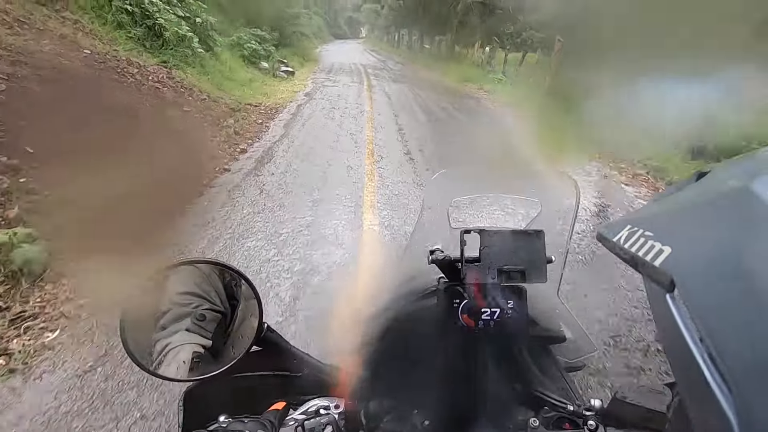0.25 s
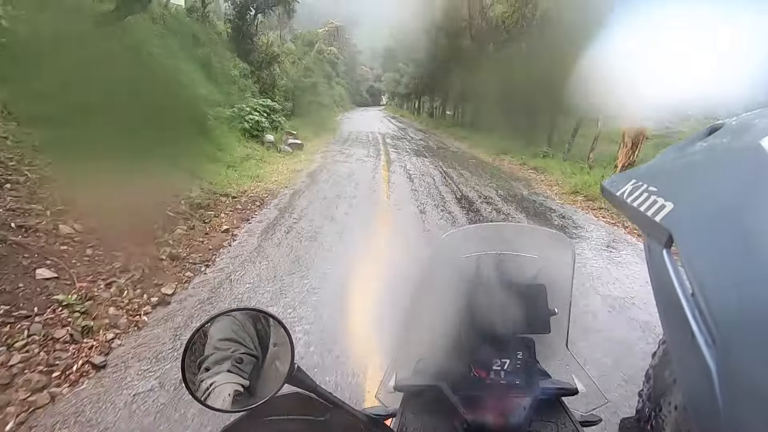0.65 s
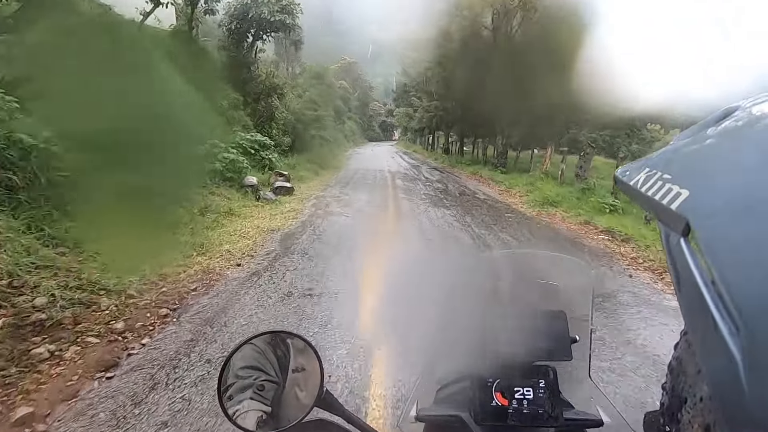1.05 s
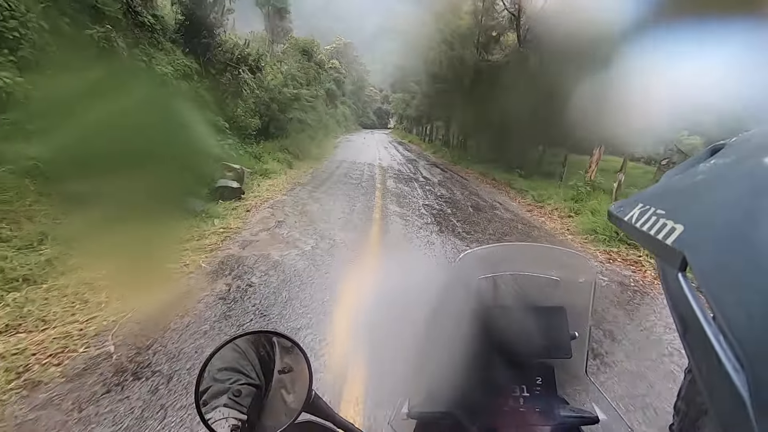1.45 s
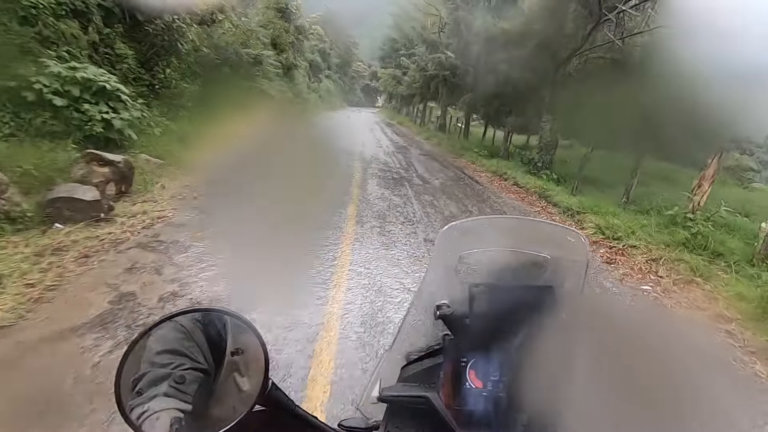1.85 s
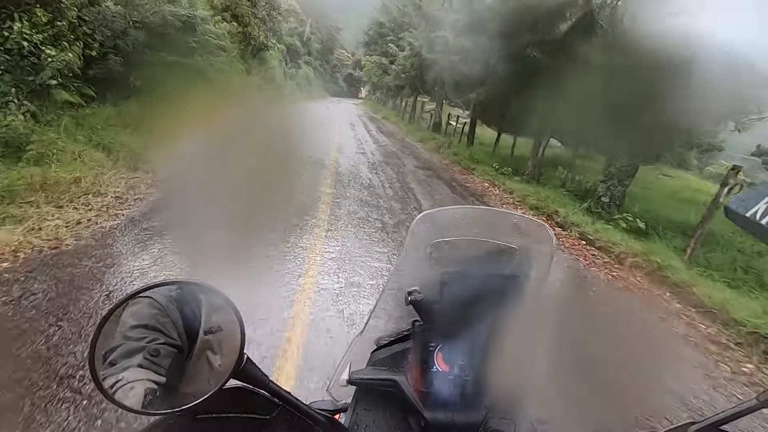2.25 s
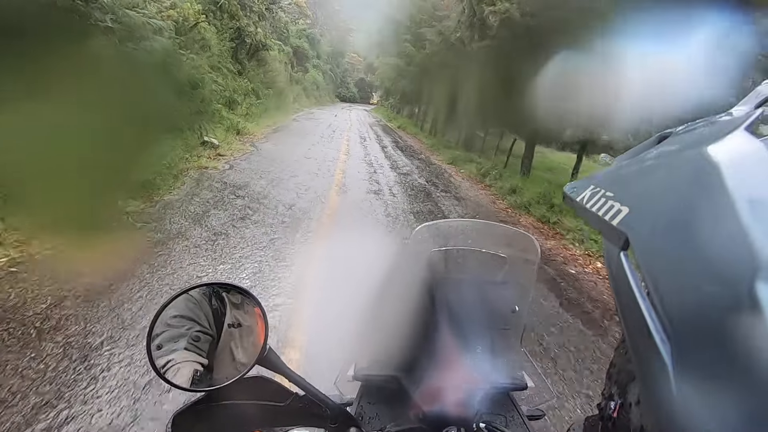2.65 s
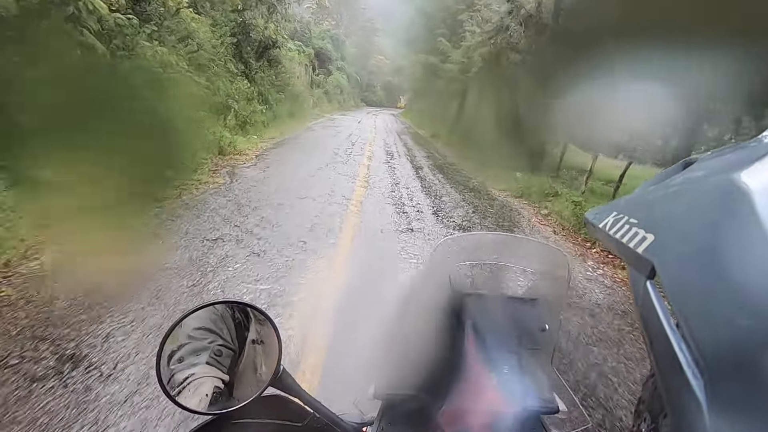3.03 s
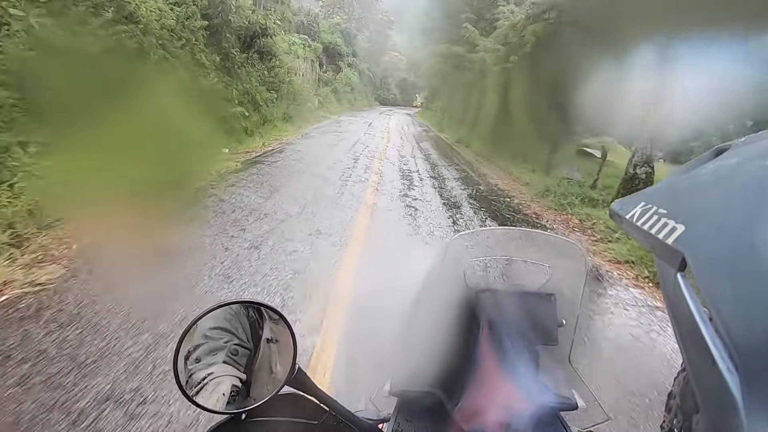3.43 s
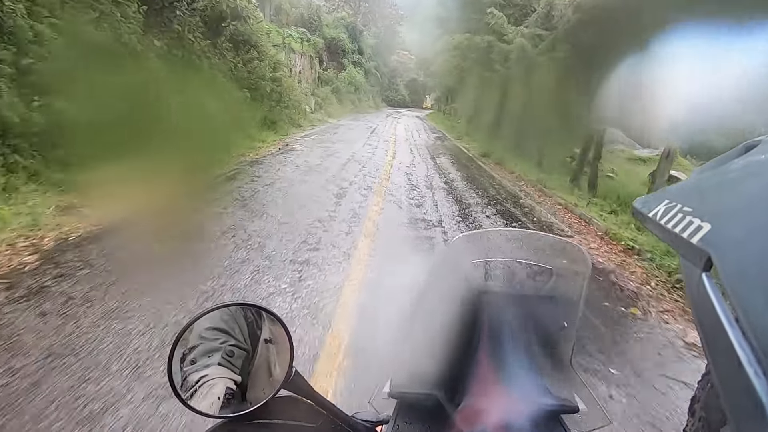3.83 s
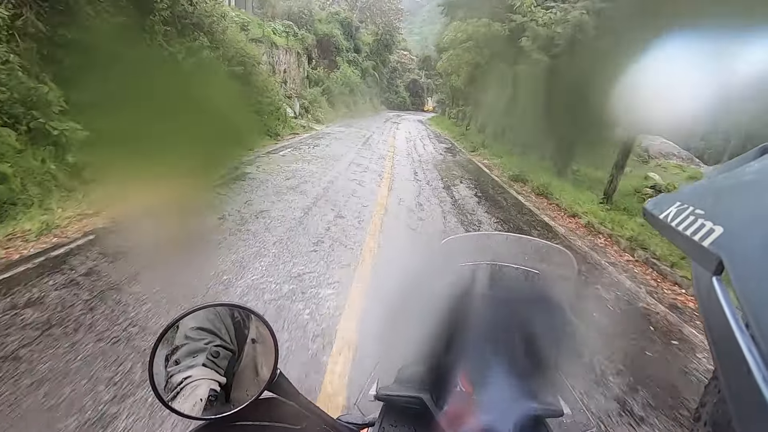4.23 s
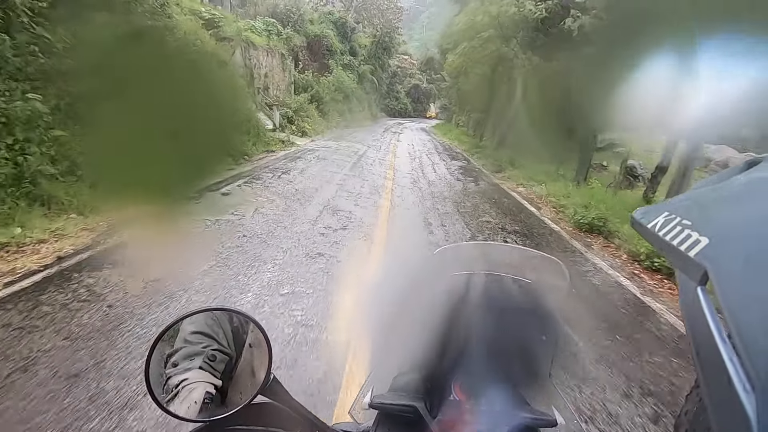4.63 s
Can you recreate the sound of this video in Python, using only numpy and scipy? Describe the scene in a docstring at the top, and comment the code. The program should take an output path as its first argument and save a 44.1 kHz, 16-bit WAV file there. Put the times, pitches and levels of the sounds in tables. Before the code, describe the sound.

Wind rumbles and tears at a rider's helmet over a low motorcycle drone, with hissing wet tyres and ticking raindrops.

```python
"""A motorcycle engine pulls, shifts up and drones on along a wet road in rain, heard at the rider's helmet.
The engine is a stack of harmonics of its firing rate, with whining gears and a ringing casing.
Wind is filtered noise: a steady rumble, flickering eddies and single slaps that merge into a tearing
roar in the gusts. Tyres hiss as grainy noise, a puddle splashes brighter, and raindrops tick as tiny
splashes with a short ring. At set moments the midrange of the wind and tyres turns hollow."""
import sys
import numpy as np
from scipy import signal
from scipy.fft import rfft, irfft
from scipy.io import wavfile
from scipy.ndimage import uniform_filter1d, minimum_filter1d

SR = 44100
rng = np.random.default_rng(int(sys.argv[2]) if len(sys.argv) > 2 else 0)


def bounce(signal):
    """Save signal as a 16-bit WAV file at the path given by the first command-line argument."""
    frames = np.transpose(np.atleast_2d(signal))
    limited = np.clip(frames, -1, 1)
    pcm = np.round(limited * 32767).astype(np.int16)
    wavfile.write(sys.argv[1], SR, pcm)


N = 215384
TIME = np.arange(N) / SR

# Levels in the tables are relative: the functions add their own trims and flutter.
# engine speed and loudness: t/s, average firing rate f/Hz, level/dB
ENGINE = [(0, 99.5, -16), (.2, 93.3, -21), (.45, 97.8, -21.5), (.75, 98.04, -18.5), (1.05, 103.6, -20),
          (1.25, 108.5, -29.5), (1.48, 114.7, -14.5), (1.62, 120.7, -30), (1.9, 125.2, -21.5),
          (2.55, 143.9, -20.5), (2.75, 121, -34), (3.0, 94.56, -30.5), (3.15, 90.2, -24), (3.35, 85, -26),
          (3.55, 85.13, -21.5), (3.85, 80.4, -22), (4.03, 81.35, -20.5), (4.25, 81.3, -20),
          (4.5, 79.5, -31), (4.72, 79, -23), (4.88, 77.5, -32)]
# exhaust note: multiple of the firing rate, level/dB
EXHAUST_ORDERS = [(.5, -12.5), (1, 2.5), (1.5, -12.5), (2, -16.5), (3, -20.5), (4, -27.5), (5, -28.5),
                  (6, -28.5)]
# resonances of the engine casing: f/Hz, width/Hz, level under load/dB
CASING = [(1610, 310, -48), (2100, 200, -51.5), (2914, 110, -58), (3820, 72, -62), (4550, 150, -64)]
# wake of the helmet: t/s, level/dB
RUMBLE = [(0, -18), (.8, -17.5), (1.4, -15.5), (2.1, -21.5), (2.92, -14.5), (3.12, -23), (3.4, -15.5),
          (4.0, -18), (4.27, -15.5), (4.5, -16.5), (4.88, -16.5)]
# airflow at the microphone: t/s, strength/dB, fine eddies relative to coarse ones/dB
GUST = [(0, -28, -6), (.07, -40, -6), (.44, -40, -1), (.52, -31, -7.5), (.64, -40, -0.5), (.96, -37.5, -7),
        (1.02, -28, -4.5), (1.18, -26.5, -7), (1.45, -33, -3.5), (1.8, -25.5, -5.5), (1.96, -27, 0.5),
        (2.01, -23, 1), (2.45, -23, 0.5), (2.61, -19.5, -4), (2.68, -24, -6), (2.89, -20.5, -5.5),
        (3.11, -30.5, -1.5), (3.32, -31.5, 0), (3.41, -28.5, -4.5), (3.66, -32.5, -2.5), (3.75, -24.5, -8),
        (3.86, -25.5, -2), (3.97, -28.5, -4.5), (4.05, -32, -2.5), (4.13, -29, -7), (4.26, -22, -5.5),
        (4.42, -31, -3.5), (4.66, -37, 2), (4.77, -29.5, -4.5), (4.88, -29.5, -3)]
# largest eddies: t/s, length/s, low push/dB, midrange flap/dB, tearing rasp/dB
SLAPS = [(0.029, 0.0059, -26.5, -36.0, -41.0), (0.092, 0.012, -31, -34.5, -47),
         (0.174, 0.0092, -19, -34, -43.0), (0.23, 0.013, -24, -31.5, -43.0),
         (0.289, 0.009, -24, -26.5, -37), (0.305, 0.01, -27, -37, -44), (0.376, 0.0096, -16, -30, -39),
         (0.404, 0.0087, -29.5, -33, -40), (0.48, 0.014, -22.5, -30.5, -40),
         (0.517, 0.0072, -23, -38.0, -41), (0.615, 0.021, -26.5, -33.5, -41), (0.87, 0.018, -25, -29, -36),
         (0.926, 0.0062, -26, -34, -45), (0.986, 0.013, -32.5, -27.5, -43),
         (1.015, 0.014, -28, -35.0, -38.5), (1.122, 0.0097, -25.5, -37, -41),
         (1.144, 0.022, -25, -33, -37.5), (1.203, 0.015, -27, -31, -35), (1.238, 0.0065, -18, -30.0, -44),
         (1.325, 0.0086, -19.5, -38, -34.5), (1.358, 0.017, -27, -32.5, -36),
         (1.411, 0.0083, -21, -43, -44.0), (1.435, 0.016, -36, -33, -39), (1.48, 0.016, -24, -33.0, -42.5),
         (1.578, 0.0079, -38.5, -28, -38), (1.613, 0.011, -25.5, -40, -43),
         (1.646, 0.0085, -37.5, -28.5, -36), (1.672, 0.023, -20.5, -27, -32),
         (1.779, 0.015, -16.5, -33, -31), (1.859, 0.016, -25.0, -28, -37), (1.887, 0.017, -26, -28, -30.5),
         (1.986, 0.011, -24, -19.5, -22.5), (2.06, 0.018, -29.0, -29, -25.5), (2.146, 0.01, -23, -22, -36),
         (2.241, 0.015, -30, -26, -27), (2.498, 0.019, -20, -23, -31), (2.528, 0.0086, -25, -23, -31),
         (2.632, 0.012, -22, -25.5, -25), (2.676, 0.0076, -19, -18.5, -27.5),
         (2.707, 0.008, -32.5, -18, -28), (2.733, 0.016, -23, -24, -30.5), (2.786, 0.013, -14.5, -27, -41),
         (2.868, 0.016, -18.5, -26, -37), (2.902, 0.014, -22, -26.5, -28.5),
         (2.924, 0.008, -18.0, -24, -29), (3.001, 0.017, -21.5, -23.5, -30.5),
         (3.065, 0.018, -26, -28, -29), (3.167, 0.029, -27.0, -33, -34.0),
         (3.244, 0.0098, -25, -34.0, -45.5), (3.272, 0.0077, -28, -28.5, -49),
         (3.342, 0.012, -30, -45.0, -46.0), (3.403, 0.0097, -19, -22.5, -33.5),
         (3.434, 0.018, -24.5, -33.5, -42.0), (3.506, 0.016, -23, -29.5, -34.5),
         (3.557, 0.023, -28, -30, -43), (3.689, 0.013, -26, -33.0, -43), (3.744, 0.005, -31, -22, -39),
         (3.777, 0.0085, -28, -28, -41), (3.804, 0.013, -19, -29, -36), (3.838, 0.012, -17, -30.5, -29),
         (3.89, 0.0088, -24.0, -27, -26), (3.959, 0.0095, -36.5, -25.5, -34),
         (3.993, 0.0068, -18, -29, -35), (4.101, 0.012, -17.5, -27.5, -39.0),
         (4.133, 0.013, -29, -29, -28.5), (4.147, 0.0073, -25, -19.5, -28),
         (4.196, 0.024, -18.5, -22, -31.5), (4.25, 0.0065, -21.5, -20.5, -39),
         (4.289, 0.011, -23, -26, -24), (4.322, 0.0059, -27, -19.5, -36), (4.353, 0.019, -26, -30.5, -34),
         (4.449, 0.024, -25.5, -36, -41), (4.515, 0.012, -26.0, -30.5, -45), (4.55, 0.0083, -35, -37, -37),
         (4.601, 0.021, -26.5, -31.5, -41), (4.681, 0.016, -28, -29.5, -34),
         (4.71, 0.0056, -33, -29, -46.5), (4.761, 0.016, -25.5, -27, -33.0), (4.807, 0.01, -19, -19.5, -30),
         (4.845, 0.0094, -20, -29, -37)]
# moments when the midrange is thinned: start t/s, end t/s, lower edge f/Hz, upper edge f/Hz
HOLLOWS = [(3.137, 3.148, 201, 800), (3.219, 3.385, 435, 1140), (3.458, 3.677, 372, 680),
           (4, 4.114, 188, 1018), (4.39, 4.697, 250, 710)]
# spray from the tyres: t/s, level/dB
SPRAY = [(0, -45.5), (.54, -49), (.66, -46), (1.42, -45), (1.85, -40.5), (2.35, -38.5), (2.72, -45.5),
         (2.95, -42), (3.17, -48), (3.4, -42), (3.62, -42), (3.82, -41.5), (4.0, -40), (4.09, -45),
         (4.17, -39.5), (4.36, -40), (4.49, -45), (4.62, -43.5), (4.88, -41.5)]
# large raindrops on the housing: t/s, splash peak level/dB, ring f/Hz, ring peak level/dB
DROPS = [(.133, -51, 3090, -50), (.3805, -50, 3030, -50), (.4474, -49, 3780, -48), (.5636, -51, 3600, -48),
         (.8096, -49, 3050, -48), (.8589, -50, 3010, -48), (1.376, -48, 3200, -34), (1.436, -49, 3050, -46),
         (1.6536, -50, 3450, -44), (1.711, -39, 3660, -23), (1.859, -34, 7457, -44),
         (1.927, -44, 3013, -45), (2.37, -47, 3990, -48), (2.68, -48, 3400, -42), (2.797, -48, 3190, -42),
         (2.836, -50, 3500, -46), (2.877, -50, 3300, -46), (2.97, -50, 3200, -46), (3.01, -50, 3400, -46),
         (3.112, -49, 5400, -44), (3.397, -38, 8270, -52), (3.512, -48, 8300, -49), (3.522, -49, 7200, -49),
         (4.0385, -46, 2200, -22), (4.048, -38.5, 7330, -47), (4.5526, -44, 3806, -40),
         (4.6558, -42.5, 3000, -36)]

# spectrum of the helmet's wake: f/Hz, level/dB
RUMBLE_COLOUR = [(40, -21), (70, -3), (100, 0), (135, -2), (170, -8.5), (230, -12), (320, -29),
                 (500, -55.5), (1000, -80)]
# spectrum of the deep buffeting: f/Hz, level/dB
DEEP_COLOUR = [(12, -1), (25, 2.5), (38, 1), (54, 10), (68, 1.5), (100, -28), (250, -80)]
# spectrum of the coarse eddies: f/Hz, level/dB
COARSE_COLOUR = [(60, -16), (140, 2.5), (250, 8), (380, 2.5), (550, 1), (800, -13), (1200, -25.5),
                 (2000, -28), (4000, -77)]
# spectrum of the fine eddies: f/Hz, level/dB
FINE_COLOUR = [(300, -25.5), (700, 7), (1100, 4.5), (1900, -1), (2600, -10), (3700, -20), (4500, -24),
               (5600, -48.5), (9000, -73), (13000, -85)]
# spectrum of a slap's blunt push: f/Hz, level/dB
PUSH_COLOUR = [(70, -30), (150, -4), (230, 0), (340, -1), (450, -13), (800, -42), (3000, -110)]
# spectrum of a slap's midrange flap: f/Hz, level/dB
BODY_COLOUR = [(280, -30), (460, -4), (560, 0), (840, -1), (1050, -14), (2000, -48), (5000, -110)]
# spectrum of a slap's tearing rasp: f/Hz, level/dB
RASP_COLOUR = [(550, -30), (950, 0), (1400, -1), (2000, -4), (2700, -14), (4200, -26), (5600, -52),
               (12000, -95)]
# spectrum of the tyre spray: f/Hz, level/dB
SPRAY_COLOUR = [(150, -24), (400, 18.5), (700, 4.5), (980, 1), (1350, -19), (2100, 0), (3000, -4),
                (3700, -8), (4400, -12.5), (5500, -24), (7500, -29.5), (9000, -40.5), (11000, -64),
                (14000, -81)]
# spectrum of the puddle's spray: f/Hz, level/dB
PUDDLE_COLOUR = [(700, -37.5), (2000, -3.5), (2800, -3), (4200, -14.0), (5500, -32.0), (9000, -48.0),
                 (13000, -78)]

# the gears unload as the rider shifts, and stay quieter: from (s), to (s), by (dB)
SHIFT_START_S, SHIFT_END_S, UNLOADED_DB = 2.3, 3.1, -12
# deep buffeting: level in the usual airflow (dB), growth (dB per dB), the usual airflow (dB)
DEEP_DB, DEEP_PER_GUST, USUAL_GUST_DB = -21.5, 0.24, -30
# a slap: time constant of its rise (s), place of the core (share of its length)
SLAP_ATTACK_S, CORE_PLACE = 0.002, 0.455
# how far the midrange drops in a hollow moment
HOLLOW_DB = 15.5
# the puddle: loudest moment (s), level there (dB), swell and fade (dB per s)
PUDDLE_S, PUDDLE_DB, PUDDLE_RISE_DB_PER_S, PUDDLE_FALL_DB_PER_S = 1.945, -32.5, 100, 150
# small raindrops: faintest splash and spread (dB), ring over splash (dB), range of the ring (Hz)
DRIZZLE_DB, DRIZZLE_SPREAD_DB, DRIZZLE_RING_DB, DRIZZLE_HZ = -62, 9, 1, (2500, 4500)
# cut-off of the final low-pass, which leaves the treble dull
EDGE_HZ = 11800


def gain_of(db):
    """Turns decibels into an amplitude factor."""
    return 10 ** (np.asarray(db) / 20)


def evened(x):
    """Scales a sound to an rms (average strength) of one."""
    return x / np.sqrt(np.mean(x ** 2) + 1e-20)


def steadied(x, size, amount=0.61):
    """Evens out part of the slow swell of a noise; size is the averaging span in samples."""
    power = uniform_filter1d(x ** 2, size=size) + 1e-6
    return evened(x / power ** (amount / 2))


def follow(rows):
    """Draws straight lines between table rows: each column at every sample."""
    s, *columns = np.transpose(rows)
    return [np.interp(TIME, s, column) for column in columns]


def coloured(x, points):
    """Filters a sound by a spectrum table, then scales it to an rms of one."""
    hz, db = np.transpose(points)
    bins_hz = np.fft.rfftfreq(N, 1 / SR)
    shape_db = np.interp(np.log(bins_hz + 1), np.log(hz), db)
    return evened(irfft(rfft(x) * gain_of(shape_db), N))


def noise(points):
    """Makes noise with the given spectrum."""
    return coloured(rng.standard_normal(N), points)


def wander(rate_hz):
    """Makes a smooth random curve of rms one that moves up to about the given rate."""
    hz = np.fft.rfftfreq(N, 1 / SR)
    # the first factor weakens drift slower than about 6 Hz
    shape = hz / (hz + 6) / (1 + (hz / rate_hz) ** 4)
    return evened(irfft(rfft(rng.standard_normal(N)) * shape, N))


def band(x, low_hz, high_hz):
    """Keeps one band of frequencies, with steep edges and no delay."""
    sos = signal.butter(4, [low_hz, high_hz], "band", fs=SR, output="sos")
    return signal.sosfiltfilt(sos, x)


def narrow(hz, width_hz):
    """Makes a fuzzy whistle: a narrow band of noise around a fixed or moving hz."""
    turn = np.exp(2j * np.pi * np.cumsum(hz * np.ones(N)) / SR)
    fuzz = wander(width_hz) + 1j * wander(width_hz)
    return evened((fuzz * turn).real)


def add(mix, s, sound):
    """Mixes a sound in at time s, cutting it off at the end."""
    part = mix[max(round(s * SR), 0):][:len(sound)]
    part += sound[:len(part)]


def engine(level_db=-1.0, throb_db=1.0):
    """Two cylinders fire unevenly, so faint half orders stand between the firing harmonics."""
    hz, db = follow(ENGINE)
    turns = np.cumsum(hz * (1 + .036 * wander(20))) / SR
    note = np.zeros(N)
    for multiple, order_db in EXHAUST_ORDERS:
        order = round(2 * multiple) / 2
        note += gain_of(order_db) * np.cos(2 * np.pi * (order * turns + rng.random()))
    return gain_of(level_db + db + throb_db * wander(79)) * note


def gears(casing_db=0.):
    """Under load the gears whine at a fixed multiple of engine speed and the casing rings."""
    hz, _ = follow(ENGINE)
    load_db = np.interp(TIME, [SHIFT_START_S, SHIFT_END_S], [0, UNLOADED_DB])
    whine_hz = 30 * uniform_filter1d(hz, size=20000)
    whine = gain_of(-56 + 2 * wander(12)) * narrow(whine_hz, 120)
    ringing = sum(gain_of(casing_db + db) * narrow(mode_hz, width_hz) for mode_hz, width_hz, db in CASING)
    return gain_of(load_db) * (whine + ringing)


def rumble(level_db=-2.0):
    """The helmet's wake presses on the microphone, over a deeper buffeting that follows the gusts."""
    db, = follow(RUMBLE)
    gust_db, _ = follow(GUST)
    wake = gain_of(level_db + db) * steadied(noise(RUMBLE_COLOUR), size=3000)
    buffet_db = DEEP_DB + DEEP_PER_GUST * (gust_db - USUAL_GUST_DB)
    return wake + gain_of(buffet_db) * steadied(noise(DEEP_COLOUR), size=5000)


def turbulence(coarse_db=0., fine_db=-2.0, patchy_db=2.0, own_db=1.0):
    """Small eddies arrive in bursts; in a strong gust they crowd into a fluttering roar."""
    db, bright_db = follow(GUST)
    # the bursts stand out less once the gust is strong
    patchiness = np.interp(db, [-28, -22], [1, .7])
    bursts = gain_of(patchiness * patchy_db * 2 * np.tanh(wander(61) / 2))
    bursts /= np.sqrt(uniform_filter1d(bursts ** 2, size=2000))
    coarse = steadied(bursts * noise(COARSE_COLOUR) * gain_of(own_db * wander(63)), size=2500)
    # fine eddies ride on the coarse ones and flutter faster
    flutter = evened(gain_of(2.5 * wander(250) + 1.0 * wander(70)))
    fine = bursts ** .4 * noise(FINE_COLOUR) * flutter
    return gain_of(db) * (gain_of(coarse_db) * coarse + gain_of(fine_db + bright_db) * fine)


def slaps(push_db=0.4, body_db=-0.95, core_db=-7.5, rasp_db=0.6, core_s=0.00055, ragged_db=1.5):
    """Each large eddy gives a blunt push, a flap with a suction pulse at its core, and a ragged rasp."""
    out, t = np.zeros(N), np.arange(2400) / SR
    push, body = noise(PUSH_COLOUR), noise(BODY_COLOUR)
    rasp = noise(RASP_COLOUR) * gain_of(ragged_db * wander(250))
    rise = 1 - np.exp(-t / SLAP_ATTACK_S)
    for s, length, low_db, mid_db, high_db in SLAPS:
        at = (np.arange(len(t)) + round(s * SR)) % N
        passing = rise * np.exp(-(t / length) ** 3)
        # low pressure in the middle of the vortex
        across = (t - CORE_PLACE * length) / (core_s * rng.uniform(.8, 1.25))
        core = (across ** 2 - 1) * np.exp(-across ** 2 / 2)
        slap = (gain_of(push_db + low_db) * evened(passing * push[at])
                + gain_of(body_db + mid_db) * evened(passing * body[at])
                + gain_of(core_db + mid_db) * evened(rise * core)
                + gain_of(rasp_db + high_db) * evened(passing * rasp[at]))
        # at equal table levels, a longer eddy carries more energy
        add(out, s, np.sqrt(length / t[-1]) * slap)
    return out


def hollowed(x):
    """At set moments a band of the midrange briefly drops, which sounds hollow."""
    out = x.copy()
    for start, end, low_hz, top_hz in HOLLOWS:
        inside = (TIME > start) & (TIME < end)
        during = uniform_filter1d(1. * inside, size=1000)  # soft edges
        out -= during * (1 - gain_of(-HOLLOW_DB)) * band(x, low_hz, top_hz)
    return out


def tyres(level_db=8.0, grain_db=2.5, flutter_db=1.86):
    """Countless droplets thrown off the tread make a hiss, dulled by the wet microphone cover."""
    db, = follow(SPRAY)
    droplets = rng.standard_normal(N) * gain_of(grain_db * wander(730))
    return gain_of(level_db + db + flutter_db * wander(22)) * coloured(droplets, SPRAY_COLOUR)


def puddle():
    """The front tyre cuts through standing water and throws a brighter spray."""
    rise_db = PUDDLE_RISE_DB_PER_S * (PUDDLE_S - TIME)
    fall_db = PUDDLE_FALL_DB_PER_S * (TIME - PUDDLE_S)
    db = PUDDLE_DB - np.maximum(rise_db, fall_db)
    droplets = rng.standard_normal(N) * gain_of(2 * wander(600))
    return gain_of(db) * coloured(droplets, PUDDLE_COLOUR)


def tick(splash_db, hz, ring_db):
    """A drop strikes the housing: a tiny sharp splash and a brief ring."""
    t = np.arange(700) / SR
    # noise that falls 60 dB in 9 ms, with a click at its start
    spatter = rng.standard_normal(len(t)) * gain_of(-60 * t / .009) + 4 * (t == 0)
    splash = band(np.pad(spatter, (40, 0)), 4000, 11500)[:len(t)]
    ring = np.sin(2 * np.pi * hz * t) * gain_of(-60 * t / .004) * (1 - np.exp(-t / .0003))
    return gain_of(splash_db) * splash / abs(splash).max() + gain_of(ring_db) * ring / abs(ring).max()


def rain(count=40):
    """A few large drops fall at set times among many small ones at random times."""
    out = np.zeros(N)
    for s, *drop in DROPS:
        add(out, s, tick(*drop))
    for when, weight, place in rng.random((count, 3)):
        # squaring makes faint drops the most common
        db = DRIZZLE_DB + DRIZZLE_SPREAD_DB * weight ** 2
        hz = np.interp(place, [0, 1], DRIZZLE_HZ)
        add(out, when * N / SR, tick(db, hz, db + DRIZZLE_RING_DB))
    return out


def scene():
    """Everything meets at one microphone."""
    bed = hollowed(rumble() + turbulence() + tyres())
    return (bed + puddle() + engine() + gears() + slaps() + rain())[None]


def record(dry):
    """A fast limiter holds the wind peaks down; then a low-pass removes the highest treble."""
    allowed = np.minimum(1, .68 / (abs(dry) + 1e-9))
    held = minimum_filter1d(allowed, size=400)
    gain = uniform_filter1d(uniform_filter1d(held, size=200), size=200)
    low_pass = signal.firwin(255, EDGE_HZ, window=("kaiser", 9), fs=SR)
    return signal.oaconvolve(dry * gain, low_pass[None], "same")


dry = scene()
out = record(dry)
bounce(out)
```